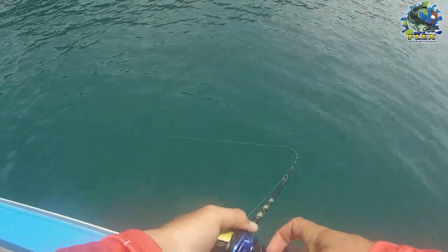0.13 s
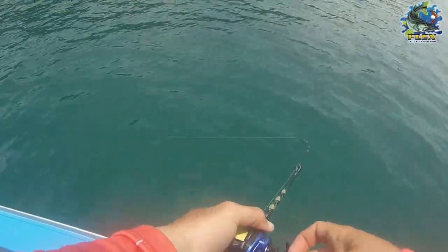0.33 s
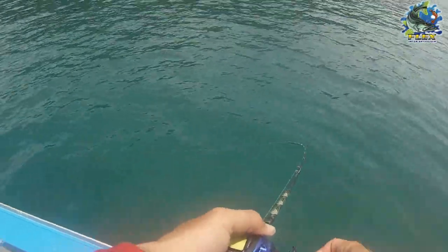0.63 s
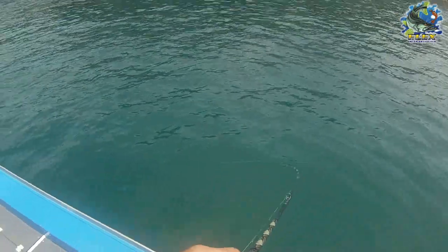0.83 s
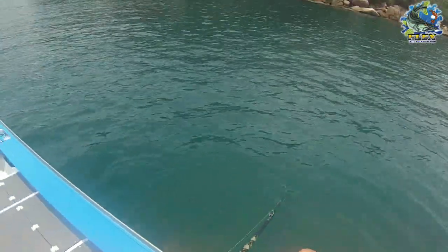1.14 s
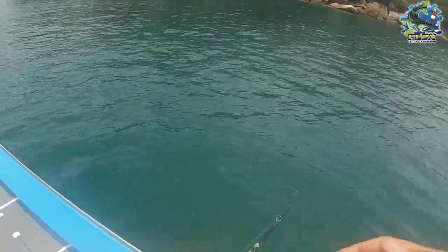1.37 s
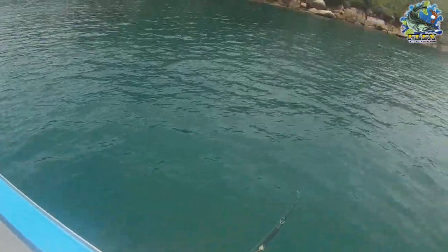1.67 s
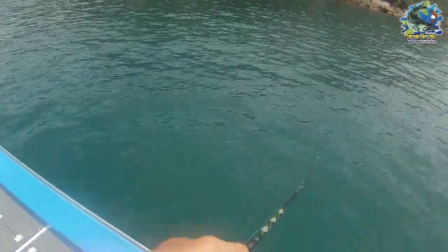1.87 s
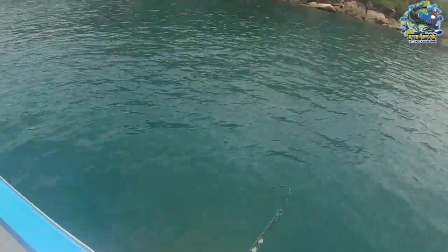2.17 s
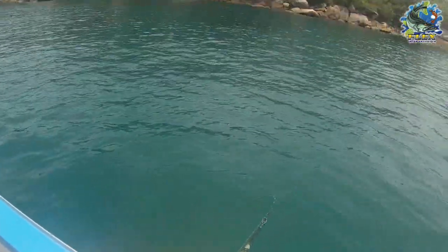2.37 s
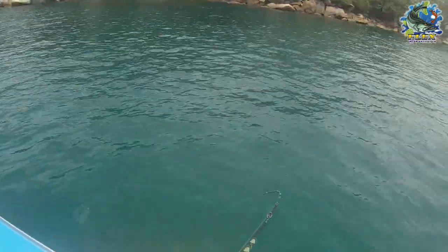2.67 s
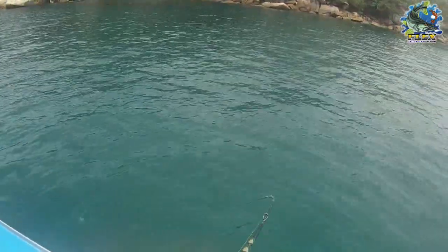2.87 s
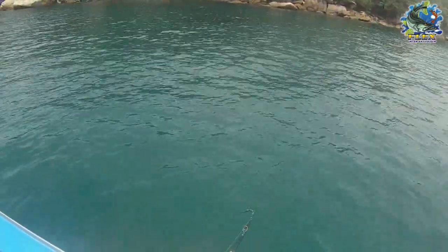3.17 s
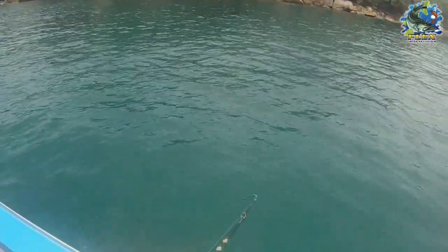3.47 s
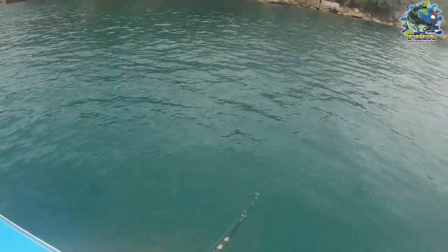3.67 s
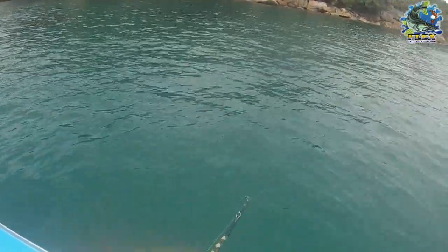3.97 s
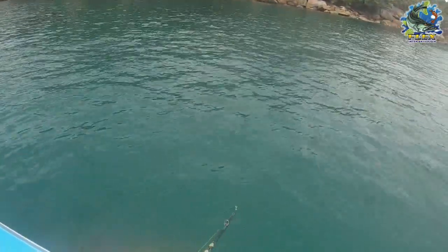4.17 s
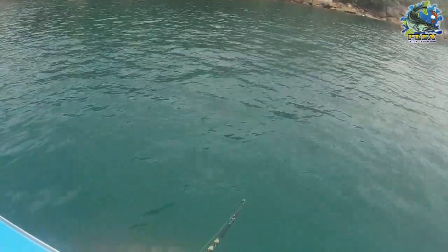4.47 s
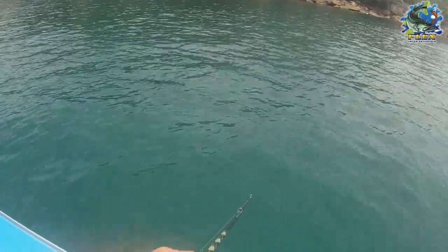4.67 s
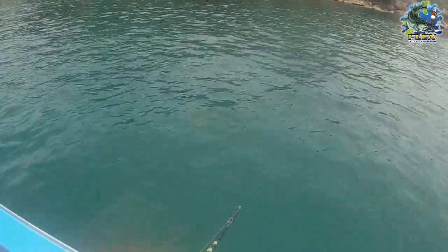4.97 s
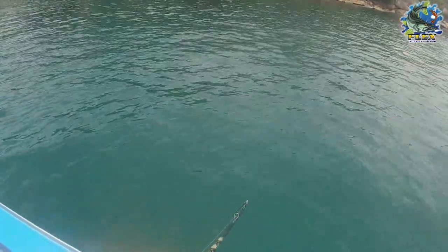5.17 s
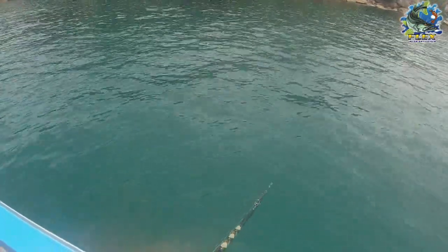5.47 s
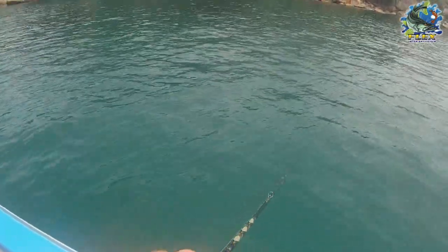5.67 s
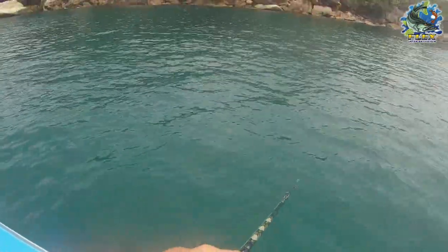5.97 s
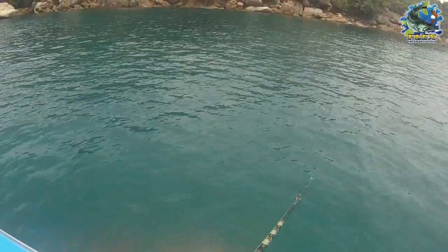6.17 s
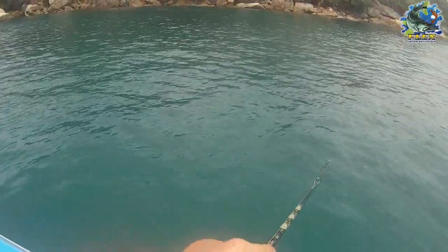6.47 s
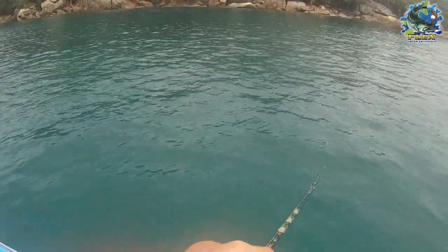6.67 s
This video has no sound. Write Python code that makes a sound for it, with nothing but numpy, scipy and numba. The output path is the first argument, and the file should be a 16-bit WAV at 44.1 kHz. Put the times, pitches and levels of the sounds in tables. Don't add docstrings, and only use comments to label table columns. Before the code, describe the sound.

Over faint lapping water and a low breeze, dull boxy thuds boom briefly through a small boat's hull. A scraping drag and small ticks lead into a crowded flurry of hard knocks around two seconds, with water surging. Knocks then thin out, leaving ringing metal, loose reel chatter, soft low hums, a very faint distant bird whistle and quiet gaps outdoors, heard from very close.

```python
import sys
import numpy as np
from numba import njit
from scipy import signal
from scipy.fft import rfft, irfft
from scipy.io import wavfile
from scipy.ndimage import uniform_filter1d

SR = 44100
rng = np.random.default_rng(int(sys.argv[2]) if len(sys.argv) > 2 else 0)


def nominal_scale(level):
    x = np.asarray(level, float) / 20
    return 10 ** x


def to_wav(s):
    ch = np.atleast_2d(s).T
    pcm = np.round(np.clip(ch, -1, 1) * 32767)
    wavfile.write(sys.argv[1], SR, pcm.astype(np.int16))


N = 300321

# (f/Hz, T60/s)
HULL_T60 = [(100, 0.11), (250, 0.31), (600, 0.16), (1500, 0.11), (4000, 0.039)]
# (f/Hz, width/Hz, level/dB)
TACKLE = [(1300, 500, -2), (2150, 380, 2), (3000, 500, -6), (4200, 600, -11), (5300, 500, -16)]
# (f/Hz, width/Hz, level/dB)
REEL = [(1240, 60, -2), (1715, 50, 0), (2050, 60, -7), (2290, 55, -4), (3040, 45, -6), (3580, 50, -11),
        (4155, 75, -2), (4410, 55, -6), (4930, 90, -3), (5460, 60, -3), (7300, 200, -11), (7630, 70, -10),
        (8700, 1400, -24), (9780, 70, -12)]


def level(x, db):
    return x * nominal_scale(db) / np.sqrt(np.mean(x ** 2))


def unit(x):
    return x / np.abs(x).max()


def add(out, s, x, db):
    i = int(s * SR)
    out[i:i + len(x)] += (unit(x) * nominal_scale(db))[:N - i]


def along(table, hz):
    table = np.array(table)
    return np.interp(np.log(hz), np.log(table[:, 0]), table[:, 1])


def curves(rows, off=-120):
    s, first, *rest = np.transpose(rows)
    t = np.arange(N) / SR
    return [np.interp(t, s, first, off, off)] + [np.interp(t, s, c) for c in rest]


def walk(rate):
    k = int(SR / rate)
    held = np.repeat(rng.standard_normal(N // k + 1), k)
    return 0.43 * uniform_filter1d(uniform_filter1d(held, k), k)[:N]


def spell(s, length, db, attack=.0087):
    t = np.arange(N) / SR
    end = s + attack + length
    release = .021 + .53 * length
    return nominal_scale(db) * np.interp(t, [s, s + attack, end, end + release], [0, 1, 1, 0]) ** 2


def band(x, lo_hz, hi_hz, order=2):
    return signal.sosfilt(signal.butter(order, [lo_hz, hi_hz], "bandpass", fs=SR, output="sos"), x)


@njit(fastmath=True)
def spin(x, real, imag, gains):
    y, a, b = np.zeros(len(x)), np.zeros(len(real)), np.zeros(len(real))
    for i in range(len(x)):
        total = 0.
        for m in range(len(real)):
            a[m], b[m] = a[m] * real[m] - b[m] * imag[m] + x[i], a[m] * imag[m] + b[m] * real[m]
            total += gains[m] * b[m]
        y[i] = total
    return y


def ring(x, hz, t60, db):
    poles = np.exp(2j * np.pi * hz / SR - np.log(1000) / (t60 * SR))
    return spin(x, poles.real.copy(), poles.imag.copy(), nominal_scale(db))


def peaks(x, table):
    hz, width, db = np.transpose(table)
    return ring(x, hz, np.log(1000) / (np.pi * width), db + 20 * np.log10(width / 500))


def contact(ms, size, grit_db=4):
    t = np.arange(size) / SR * 1000
    bounces = rng.standard_normal(size) * nominal_scale(grit_db * rng.standard_normal(size))
    fading = np.exp(-(t / (1.053 * max(ms, .3))) ** 1.055) + 1e-9
    return bounces * (1 - np.exp(-t / (.14 * ms))) * fading


def hiss():
    # (f/Hz, level/dB per Hz)
    density = [(3000, -112), (7000, -113), (11000, -118), (13000, -122), (15500, -128)]
    hz = np.arange(N // 2 + 1) * SR / N + 1
    return irfft(rfft(rng.standard_normal(N)) * nominal_scale(along(density, hz)) * np.sqrt(SR / 2), N)


def whistle(rows, flutter_db):
    s, hz, db = np.transpose(rows)
    db, hz = curves(np.transpose([s, db, hz]))
    return np.sqrt(2) * nominal_scale(db + flutter_db * walk(29.0)) * np.sin(2 * np.pi * np.cumsum(hz) / SR)


def birds():
    # (t/s, f/Hz, level/dB)
    calls = [
        [(3.335, 5100, -84), (3.39, 5500, -80), (3.44, 6500, -79), (3.47, 6950, -79), (3.51, 7200, -79),
         (3.57, 7200, -78), (3.6, 7200, -95)],
        [(3.43, 5200, -95), (3.46, 5250, -78), (3.5, 5600, -80), (3.55, 6000, -78), (3.6, 6150, -82),
         (3.62, 6150, -95)],
    ]
    return sum(nominal_scale(-2.5) * whistle(rows, 7) for rows in calls)


def wind(gain):
    return level(band(rng.standard_normal(N), 34, 80), -2.0) * gain


def water():
    # (f/Hz, level/dB per Hz)
    density = [(90, 0.5), (130, 2), (200, -5), (320, -3), (500, -2), (800, -5.5), (1200, -8.5), (1700, -12),
               (2200, -23.5), (2950, -30.5), (3500, -22.5), (5300, -32), (7000, -34), (15000, -49)]
    # (f/Hz, spread/dB)
    flicker = [(100, 3), (1000, 1.6), (3000, .7), (15000, .5)]
    out = 0
    for hz in 100 * 2 ** np.arange(0, 7.3, 1 / 3):
        noise = level(band(rng.standard_normal(N), hz / 1.12, hz * 1.12), 0)
        band_db = along(density, hz) + 10 * np.log10(hz)
        out = out + nominal_scale(band_db + along(flicker, hz) * walk(11)) * noise
    return out / np.std(band(out, 900, 2000))


def lurches():
    # (t of peak/s, microphone rumble level/dB, surge inside hull level/dB, fade/dB per s)
    lurch_table = [(0.0, -52.5, -39, 72), (.5, -43.5, -34, 54), (.6, -39, -28.5, 54), (.72, -44, -30.5, 64),
                   (1.02, -52, -29, 74), (1.399, -33, -30.5, 118), (1.62, -33, -21, 146),
                   (1.72, -55, -21, 166), (1.82, -41, -49, 250), (1.88, -57, -24.5, 150),
                   (2.052, -20.5, -12.5, 138), (2.27, -23.5, -22.5, 108), (2.35, -29.5, -20, 74),
                   (2.45, -35, -22, 145), (3.09, -31, -33.5, 73), (3.87, -41.5, -40.5, 36),
                   (4.3, -47, -27.5, 34), (4.65, -51, -38, 62), (4.95, -48, -31.5, 109),
                   (5.42, -40.5, -43.5, 47), (6.7, -44, -29.5, 45), (6.81, -45, -47, 60)]
    rise = np.array([[595], [264]])  # rumble, surge (dB per s)
    t, power = np.arange(N) / SR, 0
    for s, rumble_db, surge_db, fade in lurch_table:
        shape_db = np.where(t < s, rise * (t - s), fade * (s - t))
        power = power + nominal_scale(2 * (shape_db + np.array([[rumble_db], [surge_db]])))
    return np.sqrt(power)


def hull_modes(count=90):
    hz = 120 * (43.0 ** ((np.arange(count) + rng.random(count)) / count))
    return hz, along(HULL_T60, hz) * nominal_scale(2.7 * rng.standard_normal(count))


def slosh(hz, t60, gain):
    low = hz < 1000
    pushes = rng.standard_normal(N) * nominal_scale(8.1 * walk(30))
    body = ring(pushes, hz[low], 0.33 * t60[low], -3 * np.log2(hz[low] / 360) ** 2)
    return level(band(body, 161, 1130, order=3), -7.5) * gain


def drag():
    # (t/s, level/dB, speed/dB)
    stroke = [(.45, -60, -8), (.53, -55.5, -8), (.6, -50, -8), (.7, -49.5, -16), (.78, -50.5, -7.5),
              (.87, -54, 3.5), (.93, -52, -7), (1.0, -53, -0.5), (1.1, -51.5, -11), (1.16, -58, -3),
              (1.22, -78, -3)]
    # (f/Hz, width/Hz, level/dB)
    low_parts = [(1550, 630, -13), (1800, 130, 8), (2110, 220, 7), (2600, 540, -10)]
    # (f/Hz, width/Hz, level/dB)
    high_parts = [(3060, 170, 3.5), (2840, 300, -1), (3540, 350, -3.5), (3900, 370, -12), (5300, 500, -16)]
    db, speed_db = curves(stroke)
    slips = rng.standard_normal(N) * nominal_scale(1.6 * walk(60.8))
    low = sum(nominal_scale(1.6 * walk(25)) * peaks(slips, [part]) for part in low_parts)
    high = sum(nominal_scale(1.6 * walk(25)) * peaks(slips, [part]) for part in high_parts)
    return nominal_scale(db) * (level(band(low, 1200, 3200), 0) + nominal_scale(speed_db) * level(band(high, 2500, 6200), 0))


def scuffs():
    # (t/s, length/s, level/dB, level above 6 kHz/dB, centre f of upper hiss/Hz)
    strokes = [(0.62, 0.038, -47, -20, 8450), (0.757, 0.032, -51.5, -27, 9500),
               (0.838, 0.047, -52, -20, 9200), (1.058, 0.022, -56, -22, 9500),
               (1.532, 0.037, -47.5, -19, 9000), (1.63, 0.017, -53.5, -23, 9500),
               (1.698, 0.0047, -59, -13, 9500), (1.723, 0.033, -48.5, -10.5, 11700),
               (1.809, 0.014, -46.5, -11, 13400), (1.837, 0.029, -57, -7.5, 12500),
               (2.248, 0.036, -38.5, -19.5, 10100), (2.351, 0.011, -45, -13, 9100),
               (2.413, 0.014, -59, -13, 9800), (6.733, .008, -68.5, 4, 10500)]
    slips, out = rng.standard_normal(N) * nominal_scale(2 * rng.standard_normal(N) + 6 * walk(90)), 0
    low_top = level(band(slips, 6300, 8000), -1) * nominal_scale(3 * walk(40))
    for s, length, db, top_db, top_hz in strokes:
        lie = rng.standard_normal((len(TACKLE), 2))
        parts = []
        for (f, w, g), (a, b) in zip(TACKLE, lie):
            bright_db = (f > 3500) * (top_db + 36)
            parts.append((f * (1 + .04 * a), w, g + 2 * b + bright_db))
        mid = level(band(peaks(slips, parts), 500, 3820, order=3), 0)
        top = level(band(slips, .86 * top_hz, min(1.14 * top_hz, 15000)), 0)
        out = out + spell(s, length, db) * (mid + nominal_scale(top_db) * (low_top + top))
    return out


def rattle():
    # (t/s, length/s, level/dB)
    shakes = [(4.115, 0.017, -52.5), (4.167, 0.027, -56.5), (4.202, 0.011, -57), (4.226, .016, -56),
              (4.26, 0.022, -54), (4.305, 0.016, -55.5), (4.384, 0.012, -58.5), (4.445, 0.03, -66),
              (4.494, .02, -63), (4.64, .03, -61), (4.707, 0.05, -68), (4.4, 0.13, -68)]
    clicks = (rng.random(N) < 1100 / SR) * rng.standard_normal(N) * nominal_scale(3 * walk(40))
    reel = 0
    for part in REEL:
        reel = reel + nominal_scale(7.1 * walk(27) - 5.7 * (part[0] > 4500)) * peaks(clicks, [part])
    rod = band(peaks(clicks, TACKLE), 700, 2700, order=3)
    chatter = level(band(reel, 1100, 13000), 1.1) + level(rod, 0)
    return sum(spell(*row, attack=.001) for row in shakes) * chatter


def rings():
    # (t/s, f/Hz, level/dB, T60/s)
    metal = [(.497, 4200, -56, .08), (.632, 4000, -40, .09), (.632, 3550, -43, .06), (.735, 4550, -56, .07),
             (.785, 5450, -57, .05), (1.795, 1580, -25, .025), (3.565, 11000, -73, .25),
             (2.04, 4600, -47, .18), (2.36, 7630, -51, .25), (2.8, 4200, -58, .25), (3.03, 1660, -42, .15),
             (3.03, 4130, -46, .09), (3.034, 7550, -61, .12), (3.035, 4870, -59, .2),
             (3.09, 4870, -56.5, .42), (3.075, 1655, -40, .5), (3.085, 3040, -58, .2),
             (3.187, 1070, -42, .06), (3.187, 5450, -58, .08), (3.187, 4200, -54, .04),
             (3.187, 2400, -54, .06), (3.93, 7450, -55, .09), (4.115, 1700, -44, .12),
             (4.125, 3045, -52, .25), (4.13, 7600, -58, .1), (4.26, 4930, -56, .3), (5.37, 1300, -44, .12),
             (5.37, 500, -38, .1), (5.388, 530, -32, .12), (6.11, 4750, -58, .08), (6.52, 4750, -54, .08)]
    out = np.zeros(N)
    for s, hz, db, t60 in metal:
        force = contact(2.5, size=20000)
        pair = ring(force, hz * np.array([1, 1.006]), np.full(2, t60), np.array([0., -13]))
        add(out, s, band(pair, .8 * hz, 1.25 * hz), db)
    return out


def ticks():
    # (t/s, peak level/dB, centre f/Hz, level above 6 kHz/dB, contact/ms)
    cracks = [(0.4297, -35.5, 2600, -12, 2.9), (0.595, -34.5, 2870, -20, 3.3), (0.632, -50, 3600, -38, 5.7),
              (0.672, -44, 4000, 1, 2.2), (0.691, -37.5, 2190, -24, 8.3), (1.0654, -37.5, 2090, -22, 5.8),
              (1.3573, -37, 2750, -29, 2.7), (1.3738, -30.5, 2180, -13.5, 6.2),
              (1.6511, -46, 3080, -26, 2.4), (1.701, -34, 5280, -21, 6.2), (1.71, -23.5, 3500, -19, 1.9),
              (1.718, -41, 5000, -14, 1.5), (1.796, -22.5, 2220, -22, 2.5), (2.002, -12, 4450, -13.5, 0.82),
              (2.036, -5.5, 2400, -41, 2.2), (2.0634, -37, 4540, -25, 3), (2.1018, -36, 4300, -12, 4.7),
              (2.2412, -37.5, 5200, -12, 7.1), (4.8698, -20, 3060, -20, 10),
              (4.904, -26.5, 3040, -18, 11.5), (6.6823, -36, 4400, -26, 3.1), (3.029, -48, 3300, 6, 9.2),
              (3.916, -42, 3300, 2, 8)]
    # (t/s, peak level/dB, centre f/Hz)
    faint = [(0.0432, -52, 3900), (0.504, -45, 3000), (0.765, -38, 2170), (1.281, -44.5, 2840),
             (1.304, -52, 3100), (1.485, -46, 3550), (1.433, -48, 3000), (1.8452, -48, 2000),
             (1.977, -47, 1500), (3.188, -50, 2400), (3.37, -51, 5370), (4.054, -48, 4580),
             (4.137, -42, 4200), (4.169, -47, 2300), (4.181, -57, 5000), (4.2, -50, 2000),
             (4.224, -53, 4410), (4.233, -51, 1700), (4.2603, -50, 2330), (4.3088, -58, 2260),
             (4.383, -48, 4170), (4.391, -49, 4400), (4.203, -54, 4300), (4.443, -59, 4200),
             (4.49, -58, 4960), (4.64, -51, 5100), (1.729, -49, 3000), (5.25, -57, 2400), (5.4, -55, 3500),
             (6.23, -48, 2300), (6.1742, -45.5, 2410), (6.3087, -46, 2010), (6.488, -47.5, 2430),
             (6.724, -48, 3040)]
    # (t/s, peak level/dB, centre f/Hz, reel level/dB, contact/ms)
    clacks = [(1.5389, -32.5, 2900, 5, 4.3), (1.5789, -27.5, 2010, -15, 11), (2.3558, -28, 2080, 16, 2.6),
              (2.417, -35.5, 2890, 7, 3.3), (2.797, -38, 2920, -6, 3.6), (3.031, -32, 2330, -7, 0.95),
              (3.064, -40, 4100, 1, 17), (3.084, -35.5, 4230, 5, 11), (3.918, -32, 3660, 4, 11),
              (4.1125, -37.5, 2320, 10, 9.1), (4.8669, -17.5, 3100, -2, 8.5), (4.907, -51, 3040, -7, 11),
              (6.667, -38.5, 2160, 2, 3.6), (6.754, -31.5, 3040, -17, 10)]
    # (s, dB, Hz, top dB, reel dB, ms)
    hits = [(*c, -22, ms) for *c, ms in cracks]
    hits += [(*c, -17, -17, 3.1) for c in faint]
    hits += [(s, db, hz, -28, reel_db, ms) for s, db, hz, reel_db, ms in clacks]
    out = np.zeros(N)
    for s, db, centre_hz, top_db, reel_db, ms in hits:
        force = contact(ms, size=6000)
        body = band(force, 0.58 * centre_hz, 1.16 * centre_hz, order=3)
        body = body + 0.76 * band(force, 610, 4630, order=4)
        top = band(force, 6000, 6000 + 1.6 * centre_hz, order=3)
        parts = [(f, w, g + rng.standard_normal()) for f, w, g in REEL]
        reel = band(peaks(force, parts), 450, 11000)
        add(out, s - .001, unit(body) + nominal_scale(top_db) * unit(top) + nominal_scale(reel_db) * unit(reel), db)
    return out


def hums():
    # (t/s, length/s, level/dB, first f/Hz, last f/Hz)
    tones = [
        (3.928, 0.04, -32, 134, 118),
        (4.009, 0.028, -39, 111.3, 109),
        (4.4, 0.096, -42, 150.6, 141),
        (4.537, 0.047, -44, 157.8, 149),
        (4.646, 0.18, -45, 148, 141.6),
    ]
    t, out = np.arange(N) / SR, 0
    for s, length, db, first_hz, last_hz in tones:
        hz = np.interp(t, [s, s + length], [first_hz, last_hz])
        gain = spell(s, length, db + 3 * walk(30.0))
        out = out + gain * np.sqrt(2) * np.sin(2 * np.pi * np.cumsum(hz) / SR)
    return out


def thumps():
    # (t/s, peak level/dB, f/Hz, T60/s)
    jolts = [(1.374, -29.5, 45.4, 0.13), (1.798, -31.5, 42, 0.093), (2.04, -25, 47.7, 0.11),
             (2.26, -20.5, 57.7, 0.17), (3.101, -35, 58, .12), (2.032, -13, 324, 0.057),
             (2.139, -28, 900, 0.069), (2.036, -14.5, 1550, 0.032), (3.066, -21, 153, 0.15),
             (4.199, -38.5, 120, .25), (4.289, -36.5, 130, 0.18), (4.8644, -23.5, 1735, .025),
             (1.7092, -22.5, 1620, 0.015), (1.852, -17.5, 453, 0.054), (2.001, -21.5, 850, 0.015),
             (2.308, -27, 940, 0.036), (2.345, -26, 300, .06), (3.08, -21, 578, 0.072)]
    t, out = np.arange(9000) / SR, np.zeros(N)
    for s, db, hz, t60 in jolts:
        onset = 1 - np.exp(-t * hz * 4)
        add(out, s, -np.sin(2 * np.pi * hz * t) * nominal_scale(-60 * t / t60) * onset, db)
    return out


def panel_notes(s, force, share):
    # (t/s, f/Hz, f/Hz, f/Hz, f/Hz)
    woken = [(0.503, 360, 227, 433, 880), (0.629, 363.4, 994, 734, 812), (0.647, 261.6, 326, 980, 680),
             (0.709, 484, 314, 1046, 890), (1.048, 289.5, 481, 400, 790), (1.373, 332, 472, 189, 780),
             (1.541, 1710, 456, 338, 1030), (1.577, 469, 611, 264.5, 916), (1.704, 450, 1710, 900, 1600),
             (1.843, 347, 912, 485, 740), (1.975, 930, 720, 1020, 493), (2.034, 758, 874, 587, 985),
             (2.137, 200, 903, 313, 667), (2.208, 220, 476, 660, 840), (2.257, 758, 1060, 340, 234),
             (2.298, 568, 950, 707, 854), (2.356, 243, 540, 806, 1020), (2.419, 590, 280, 870, 684),
             (2.797, 620, 906, 1276, 394), (3.029, 1060, 775, 1636, 315), (3.061, 339, 528, 414, 670),
             (3.089, 600, 227, 340, 455), (3.919, 1000, 1500, 1070, 447), (4.116, 1674, 305, 1080, 742),
             (4.227, 324, 744, 240, 1070), (4.301, 343, 500, 658, 1712), (4.385, 330, 281, 442, 594),
             (4.438, 288, 404, 530, 725), (4.865, 384, 301, 1650, 468), (4.905, 1280, 354, 695, 480),
             (5.255, 644, 458, 1130, 690), (6.672, 356, 531, 219, 734), (6.748, 1320, 1730, 980, 570)]
    out = 0
    for at, *pitches in woken:
        if abs(at - s) >= .008:
            continue
        for rank, hz in enumerate(pitches):
            t60 = along(HULL_T60, hz) * share * .56
            tone = ring(force, np.array([1. * hz]), np.array([t60]), np.zeros(1))
            tone = band(tone, .8 * hz, 1.25 * hz, order=1)
            out = out + unit(tone) * nominal_scale(-3 * np.log2(hz / 300) - 2 * rank)
    return out


def knocks(hz, t60):
    # (t/s, peak level/dB, strongest f/Hz, hardness/dB, contact/ms)
    blows = [(0.629, -5.5, 467, -37, 7.9), (0.647, -13, 315, -7, 11), (0.709, -22.5, 335, -14, 25),
             (1.373, -17.5, 305, -43, 12), (1.541, -25, 333, 7, 6.5), (1.576, -6.5, 542, -47, 15.4),
             (1.704, -24, 443, -11, 11.5), (1.842, -13, 420, -12.5, 13.3), (2.208, -33, 600, -31, 12),
             (2.356, -10, 241, 1, 12.7), (2.419, -14.5, 540, -26, 9.3), (3.027, -24.5, 325, 18, 11),
             (3.061, -7.5, 333, -69, 12), (4.116, -21.5, 318, -3, 6.6), (4.227, -27.5, 330, 11, 16),
             (4.299, -17, 332, -79, 22), (6.670, -20, 327, -8, 17.8)]
    raps = [(1.796, -18.5, 1160, -10, 1.7), (1.975, -28, 207, 22, 6.4), (2.034, -4, 815, -33, 7.3),
            (2.036, -3.5, 305, -15, 8.2), (2.138, -19, 338, -50, 7), (2.257, -5, 292, -14, 10),
            (2.796, -18, 580, -26, 10), (3.919, -20, 970, 23, 5.8), (4.865, -10.5, 324, 7, 18),
            (4.905, -16.5, 290, -4, 12.7), (5.255, -33.5, 627, -70, 4.9), (6.749, -17.5, 870, 6.5, 5.6)]
    # (t/s, peak level/dB, strongest f/Hz)
    bumps = [(0.416, -32, 540), (0.441, -33, 565), (0.503, -28, 232), (0.778, -29, 360),
             (0.878, -28.5, 343), (0.934, -31, 462), (0.961, -28.5, 183), (0.994, -34, 318),
             (1.048, -25.5, 293), (1.337, -34, 445), (2.298, -25.5, 236), (2.83, -28.5, 347),
             (3.088, -20.5, 220), (3.189, -31.5, 185), (3.321, -38, 151), (3.838, -27, 220),
             (3.871, -33.5, 230), (4.157, -25.5, 264), (4.337, -30, 340), (4.385, -28, 330),
             (4.438, -27.5, 302), (4.706, -35.5, 152)]
    # (f/Hz, level/dB)
    favoured = [(350, 5), (582, 5), (757, 4), (984, 11), (1285, 12.5), (1715, 8.5)]
    hits = [(*b, .46) for b in blows] + [(*b, .28) for b in raps] + [(*b, -43.5, 23.6, .5) for b in bumps]
    out = np.zeros(N)
    for s, db, pitch_hz, hard_db, ms, share in hits:
        octaves = np.log2(hz / pitch_hz)
        below_db = -13 * octaves ** 2
        above_db = min(hard_db - 22.5, 0) * np.abs(octaves / np.log2(3000 / pitch_hz)) ** 1.38
        reach_db = np.where(octaves < 0, below_db, above_db)
        deck_db = 5 * np.exp(-(np.log2(hz / 1050) / 1.3) ** 2)
        gains_db = reach_db + deck_db + 4 * rng.standard_normal(len(hz))
        shifted = hz * (1 + 0.0327 * rng.standard_normal(len(hz)))
        for f, boost_db in favoured:
            gains_db = gains_db + boost_db * np.exp(-(np.log2(shifted / f) / .11) ** 2)
        ring_share = 2 * np.clip(share, .05, 2)
        force = contact(ms, size=13000)
        packed = ring(force, shifted, t60 * ring_share, gains_db)
        packed = band(packed, max(.6 * pitch_hz, 160), 5400, order=3)
        boom = unit(packed) + nominal_scale(1) / 2 * panel_notes(s, force, ring_share)
        add(out, s - .001, boom, db)
    return out


def scene():
    # (t/s, breeze on microphone level/dB, lapping outside level/dB)
    calm = [
        (0, -52, -57.5),
        (1.3, -51, -55),
        (2.5, -49, -56),
        (3, -57, -57),
        (3.9, -54.5, -57.5),
        (4.3, -68, -55),
        (5.3, -55, -54),
        (5.7, -56, -53.5),
        (6.81, -47, -54),
    ]
    breeze_db, lap_db = curves(calm)
    rumble, surge = lurches()
    hz, t60 = hull_modes()
    bilge = slosh(hz, t60, np.hypot(surge, nominal_scale(lap_db + 6)))
    lapping = np.hypot(nominal_scale(lap_db), surge * nominal_scale(-29.5)) * water()
    air = wind(np.hypot(rumble, nominal_scale(breeze_db))) + birds()
    tackle = ticks() + rings() + scuffs() + rattle() + drag()
    hull = knocks(hz, t60) + hums() + thumps()
    return (hull + tackle + bilge + air + lapping)[None]


def band_limit(x):
    return signal.sosfilt(signal.butter(12, 16370, fs=SR, output="sos"), x)


def record(dry):
    # (f/Hz, width/Hz, level/dB)
    housing = [(2940, 320, 6), (5250, 400, 4.5)]
    heard = dry
    for hz, width, db in housing:
        heard = heard + (nominal_scale(db) - 1) * band(dry, hz - width / 2, hz + width / 2, order=1)
    cut = signal.ellip(8, .2, 28, 15150, fs=SR, output="sos")
    mix = signal.sosfilt(cut, np.clip(heard, -1, 1) + hiss())
    return band_limit(mix)


dry = scene()
out = record(dry)
to_wav(out)
```